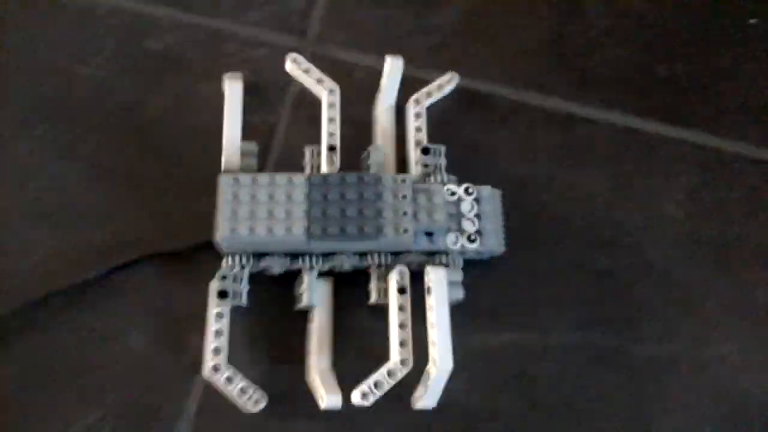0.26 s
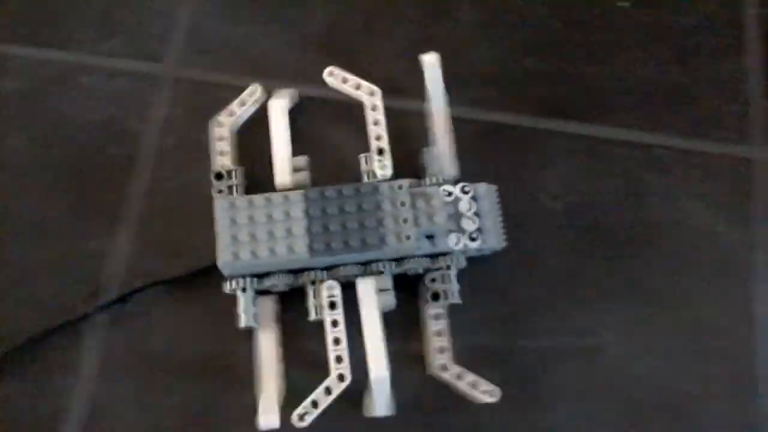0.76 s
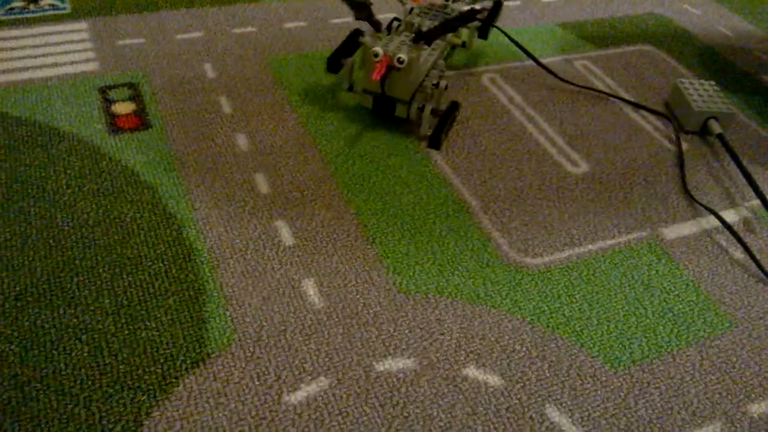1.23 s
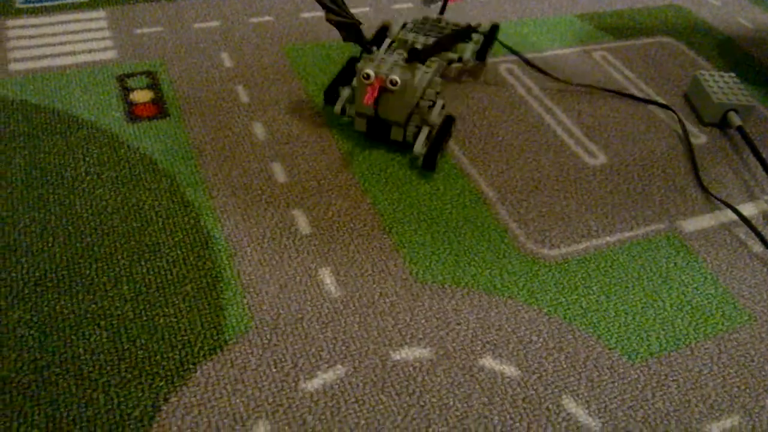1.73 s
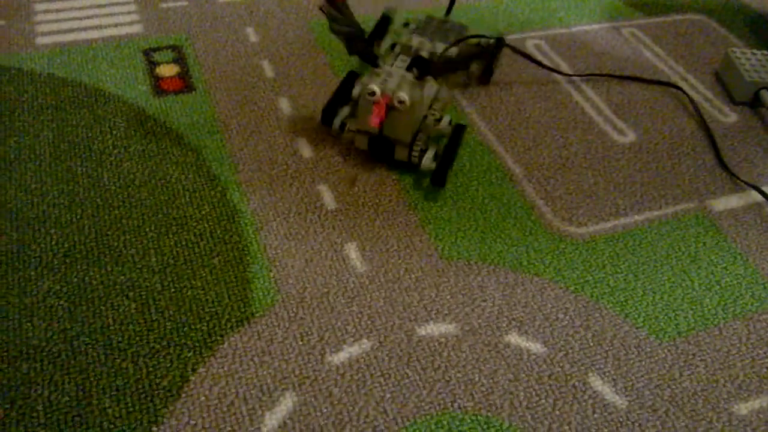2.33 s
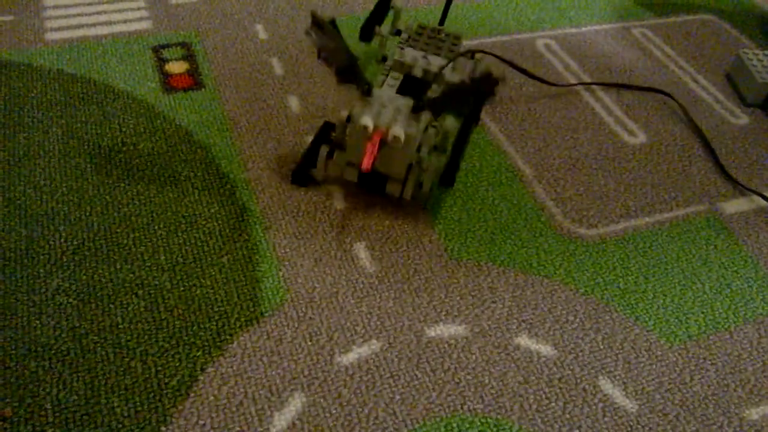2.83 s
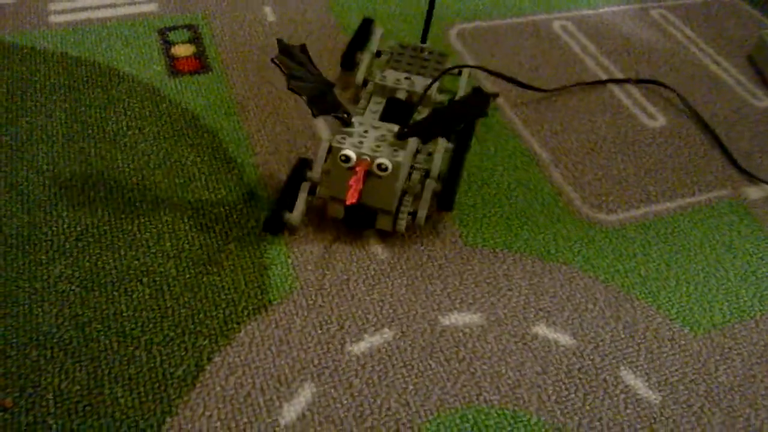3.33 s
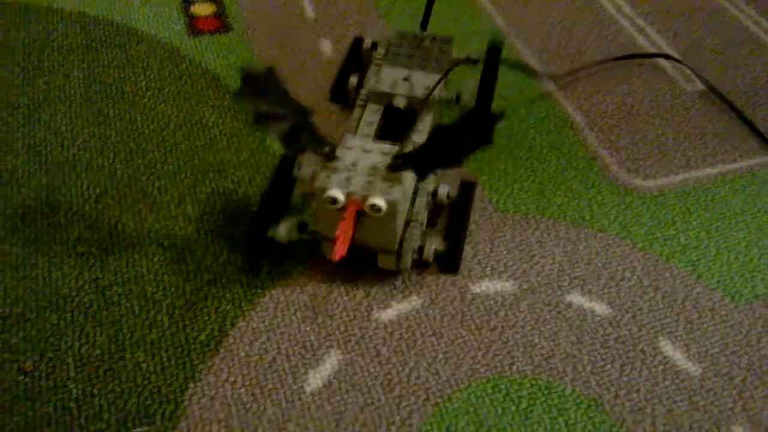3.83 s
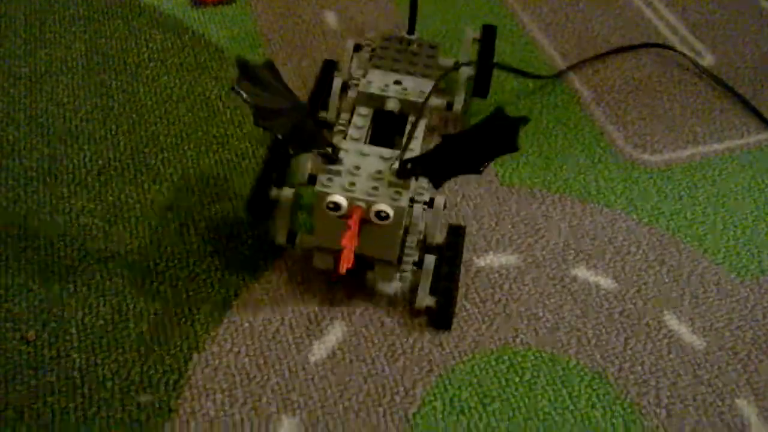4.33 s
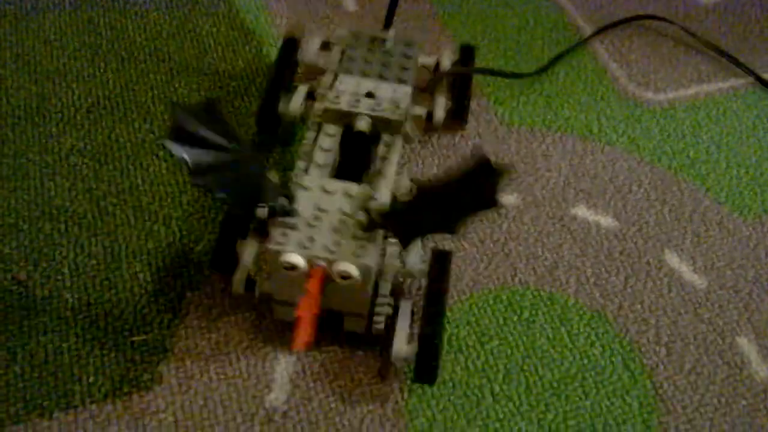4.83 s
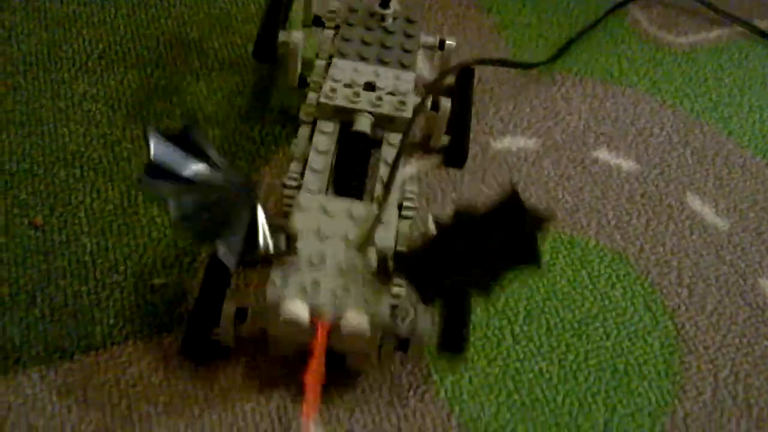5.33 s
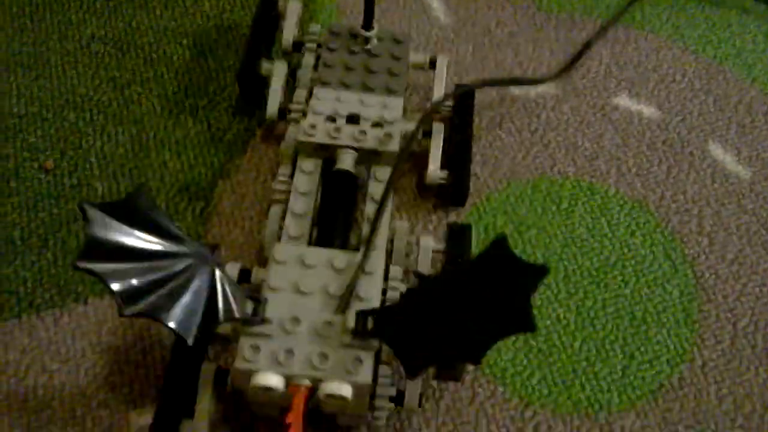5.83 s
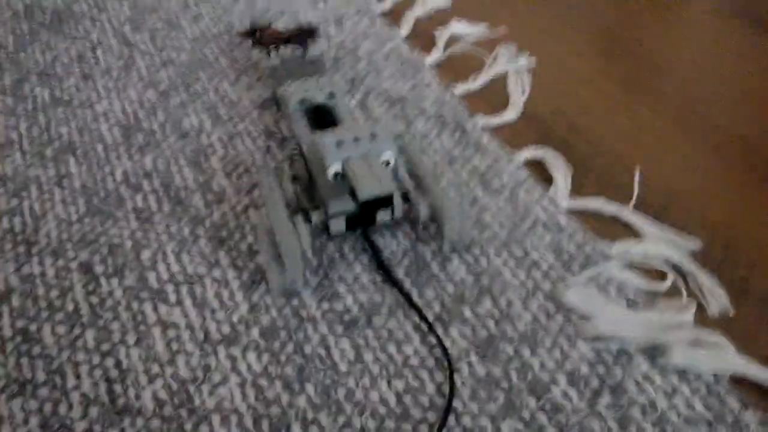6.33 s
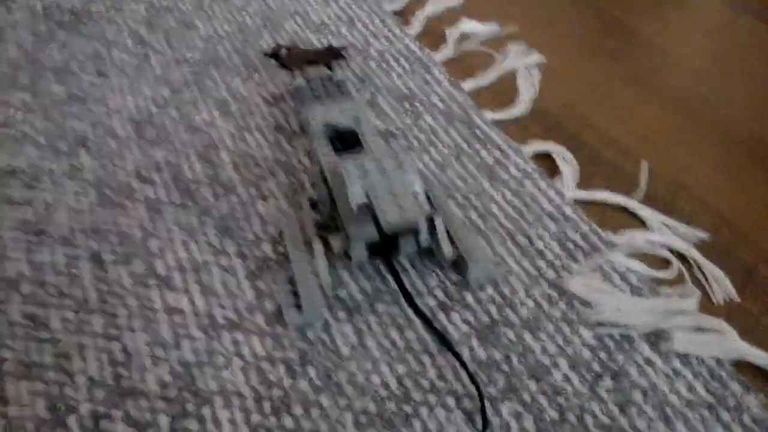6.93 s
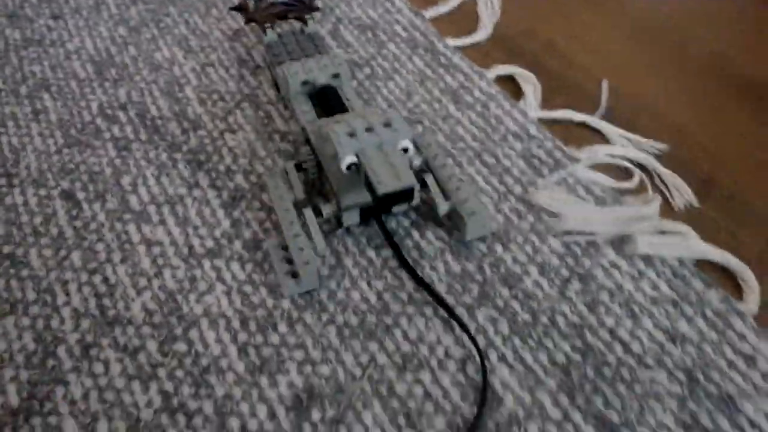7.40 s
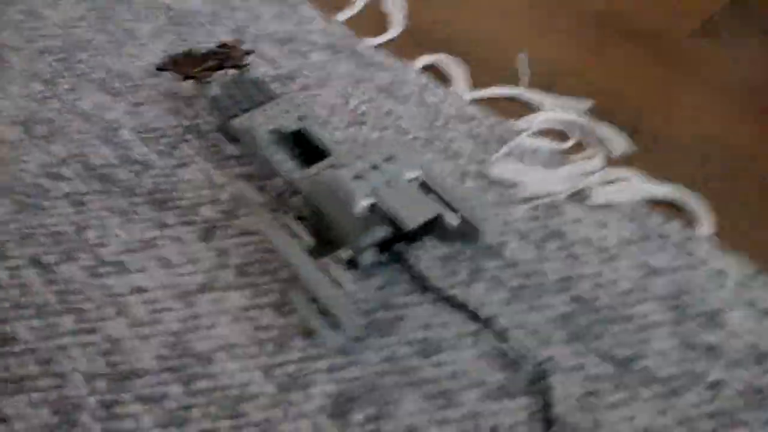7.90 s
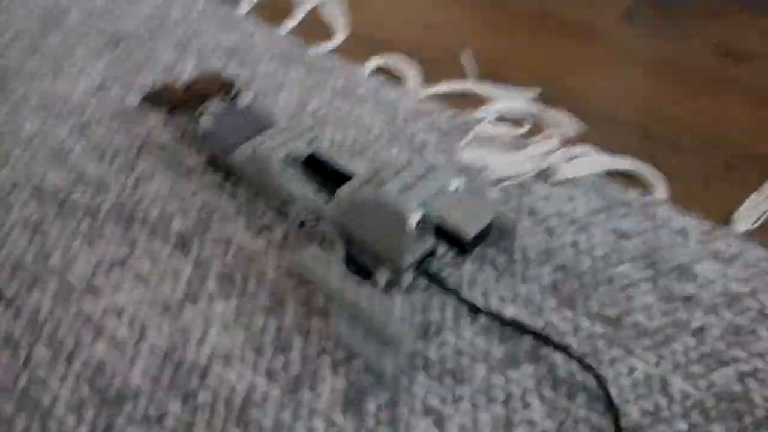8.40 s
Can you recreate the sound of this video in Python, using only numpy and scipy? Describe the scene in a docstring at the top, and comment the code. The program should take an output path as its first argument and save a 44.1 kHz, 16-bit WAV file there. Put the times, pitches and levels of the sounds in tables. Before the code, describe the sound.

Close dry rattle of small plastic gear toys: clattering steps over a faint hum, pulsing gear buzz growing nearer, then dull thuds with free-running whirrs.

```python
"""Three motorised plastic-brick walkers, close by indoors, one scene each.
A spider clacks over tiles on a humming motor, its legs squeaking, until a button is pressed.
A dragon crosses a play mat: gears surge twice a stride, its shaft snaps; two more presses follow.
A long-tailed creature thuds onto a rug, its slack gears run free, and it turns side-on at last.
Gear-tooth contacts, clacks and shaft ticks are noise bursts ringing resonances; thuds are damped sines."""
import sys
import numpy as np
from scipy import signal
from scipy.fft import rfft, irfft
from scipy.io import wavfile
from scipy.ndimage import uniform_filter1d

SR = 44100
rng = np.random.default_rng(int(sys.argv[2]) if len(sys.argv) > 2 else 0)


def wav_out(sig):
    """Save sig, one row per channel (or a flat mono array), as 16-bit PCM at SR to the path in sys.argv[1]."""
    wavfile.write(sys.argv[1], SR, np.round(np.clip(np.atleast_2d(sig).T, -1, 1) * 32767).astype(np.int16))


N = 381906
T = np.arange(N) / SR  # s
HZ = np.fft.rfftfreq(4096, 1 / SR)  # filter design grid
DRAGON_STRIDE_S = .6275

# The three scenes. Each row: start in seconds, end in seconds, fade-in in seconds.
SCENES = [(-.01, 1.021, 0.0068), (1.066, 6.224, 0.077), (6.286, 8.7, 0.1)]


def amp(db):
    """Decibels to gain."""
    return 10 ** (np.asarray(db) / 20)


def evened(x):
    """Scales to rms 1."""
    return x / np.sqrt(np.mean(x ** 2) + 1e-20)


def steadied(x, size=2600):
    """Scales to rms 1 locally, leaving the fast grain."""
    local_power = uniform_filter1d(uniform_filter1d(x ** 2, size), size)
    return x / np.sqrt(local_power + 1e-12)


def read(points, hz):
    """Reads a table on a log-frequency axis."""
    f, value = np.transpose(points)
    return np.interp(np.log(hz + 1), np.log(f), value)


def over_time(points):
    """Reads a table of (s, value) at every sample."""
    return np.interp(T, *np.transpose(points))


def add(mix, s, sound):
    """Mixes a sound in at time s."""
    part = mix[max(round(s * SR), 0):][:len(sound)]
    part += sound[:len(part)]


def drift(size):
    """Slow random signal of rms 1, smoothed twice over size samples."""
    return evened(uniform_filter1d(uniform_filter1d(rng.standard_normal(N), size), size))


def swell(t, rise_s, hold_s, fall_s):
    """Rises to 1 at t = 0, holds, and falls back to 0."""
    rise = 1 + t / rise_s
    fall = 1 - (t - hold_s) / fall_s
    return np.clip(np.minimum(rise, fall), 0, 1)


def jolt(s, decay_s):
    """Jumps to 1 at time s and dies away."""
    return (T >= s) * np.exp(-abs(T - s) / decay_s)


def resonances(modes):
    """Gain over frequency of damped modes; each is 3 dB down at the edges of its width."""
    power = 0
    for hz, width_hz, db in modes:
        power = power + (amp(db) / (1 + (1.3 * (HZ - hz) / width_hz) ** 2)) ** 2
    return np.sqrt(power)


def colour(x, gain):
    """Causal minimum-phase filter of unit energy, shaped by the gain over frequency."""
    log_gain = np.log(np.maximum(np.r_[gain, gain[-2:0:-1]], 1e-5))
    taps = np.fft.ifft(np.exp(np.conj(signal.hilbert(log_gain)))).real
    return signal.oaconvolve(x, taps / np.linalg.norm(taps))[:len(x)]


def contact(decay_s, size=900):
    """Plastic meets plastic: a burst of tiny rebounds, of unit energy."""
    t = np.arange(size) / SR
    envelope = np.exp(-t / decay_s) * (1 - np.exp(-t / 0.00051))
    burst = rng.standard_normal(size) * envelope
    return burst / np.linalg.norm(burst)


def strikes(rate_hz, jitter, spread_db, decay_s, count=10):
    """Contacts at a running rate, uneven in time and force, on several different teeth."""
    turns = np.cumsum(rate_hz) / SR + rng.random()
    at = np.flatnonzero(np.diff(np.floor(turns)))
    late, force = np.clip(rng.standard_normal((N // 20, 2))[:len(at)], -2, 2).T
    at = np.clip(at + jitter * late * SR / rate_hz[at], 0, N - 1).astype(int)  # jitter in periods
    tooth = rng.integers(0, count, N // 20)[:len(at)]
    out = np.zeros(N)
    for k in range(count):
        train = np.bincount(at, amp(spread_db * force) * (tooth == k), N)
        out += signal.oaconvolve(train, contact(decay_s))[:N]
    return evened(out)


def in_room(x, wet_db, size=14000):
    """Adds a short diffuse tail that dies fastest around 6 kHz."""
    # Reverberation. Each row: frequency in Hz, time to fall 60 dB in seconds.
    room_t60 = [(200, 0.47), (2000, 0.33), (6000, 0.13), (14000, 0.37)]
    noise = rng.standard_normal(size) * (np.arange(size) > 200)
    hz, t, z = signal.stft(noise, SR, nperseg=256)
    decay_db = -60 * t / read(room_t60, hz)[:, None]
    tail = signal.istft(z * amp(decay_db), SR, nperseg=256)[1]
    return x + amp(wet_db) * signal.oaconvolve(x, tail / np.linalg.norm(tail))[:N]


def shifting(x, patchy_db, size=512):
    """Moving parts shade and bare one another, so the rattle's colour keeps shifting."""
    z = signal.stft(x, nperseg=size)[2]
    patches = uniform_filter1d(rng.standard_normal(z.shape), size=9, axis=0)  # over frequency
    patches = uniform_filter1d(patches, size=12, axis=1)  # over time
    return signal.istft(z * amp(patchy_db * evened(patches)), nperseg=size)[1][:N]


def turning(x, tone, share):
    """Blends in the tone that a walker has when heard from another side."""
    other = irfft(rfft(x) * amp(read(tone, np.fft.rfftfreq(N, 1 / SR))), N)
    return x + share * (other - x)


def rumble(level_db, floor, uneven_db):
    """Small dense bumps make a low rumble."""
    bumps = strikes(np.full(N, 260), jitter=.5, spread_db=3.5, decay_s=.003, count=4)
    gain = amp(read(floor, HZ) - HZ / 400)  # treble loss on top of the floor's own response
    return amp(level_db + uneven_db * drift(size=2200)) * steadied(colour(bumps, gain))


def whine(x):
    """Faint high tones that follow the level of the treble."""
    # Thin tones. Each row: frequency in Hz, level in dB against the mean size of the treble.
    whine_tones = [(7500, -19), (8000, -23), (8500, -25), (9000, -23), (10499, -12), (11000, -25)]
    treble = signal.sosfilt(signal.butter(4, 7000, "high", fs=SR, output="sos"), x)
    level = uniform_filter1d(abs(treble), size=3000) * (x != 0)
    tones = sum(amp(db) * np.sqrt(2) * np.sin(2 * np.pi * hz * T) for hz, db in whine_tones)
    return level * tones


def knocks(rows, damping):
    """Dull blows: a low push that is gone within two cycles."""
    out = np.zeros(N)
    for s, peak_db, hz, *_ in rows:
        cycles = hz * T[:1000]
        push = np.sin(2 * np.pi * cycles) * cycles * np.exp(-damping * cycles)
        add(out, s, amp(peak_db) * push / abs(push).max())
    return out


def button():
    """A pressed button knocks and nudges its case; the first press leaves it ringing faintly."""
    # Button presses. Each row: time in seconds, peak of the knock in dB, frequency in Hz.
    presses = [(0.9663, -19.5, 650), (6.0394, -40.5, 650), (6.1753, -25, 590)]
    thump_hz, thump_db = 202, -14  # nudge of the whole case, against the knock
    out, t = knocks(presses, damping=3), T[:6000]
    add(out, presses[0][0], amp(-43) * np.sin(2 * np.pi * 402 * t) * np.exp(-t / 0.068))
    thumps = [(s, db + thump_db, thump_hz) for s, db, _ in presses]
    return out + knocks(thumps, damping=2.4)


def squeaks():
    """Rubbing legs: quick uneven slips excite one narrow mode of a leg."""
    # Squeaks. Each row: start in seconds, end in seconds, frequency in Hz, level in dB.
    rubs = [(0.323, 0.367, 2150, -37), (0.538, 0.743, 2105, -47), (7.591, 7.782, 2224, -39.5),
            (8.547, 8.668, 2360, -42.5)]
    out = np.zeros(N)
    slips = strikes(np.full(N, 400), jitter=0.28, spread_db=-1.5, decay_s=0.0029, count=3)
    for start, end, hz, db in rubs:
        rub = np.clip(np.minimum(T - start, end - T) / 0.032, 0, 1)
        out += amp(db) * rub * colour(slips, resonances([(hz, 135, 0)]))
    return out


def clacks(rows, span, body, decay_s):
    """Hard contacts of the gait, and other clacks, ring the same body."""
    # Other clacks, including those around the button press.
    # Each row: time in seconds, level in dB, brightness in dB per octave.
    other_clacks = [(.0585, -53, -2.5), (0.092, -54, -12), (0.3937, -52, -2), (.4793, -42, -1),
                    (0.7963, -47, -10), (0.9649, -41, -7.5), (1.0134, -49, -14), (4.8127, -48.5, 1),
                    (5.5714, -41.5, 10), (5.8657, -42.5, 3), (6.1963, -43, 8), (6.3882, -42.5, 2),
                    (6.4399, -48, 0.5), (6.891, -45, 2), (7.073, -46, -1.5), (7.2343, -44, -1),
                    (7.6108, -39.5, -2), (7.7012, -33.5, -4), (7.7689, -37.5, 19), (8.323, -33, 6),
                    (8.5857, -38, 8)]
    octaves = np.log2(np.clip(HZ, 1500, 10000) / 4000)
    out = np.zeros(N)
    for s, db, tilt_db in rows + other_clacks:
        if span[0] <= s < span[1]:
            gain = resonances(body) * amp(tilt_db * octaves)
            add(out, s, amp(db) * evened(colour(contact(decay_s), gain)))
    return out


def gear_tone(pitch_hz, level_db, waver):
    """The fastest gear sings a thin, unsteady note."""
    turns = np.cumsum(pitch_hz * (1 + waver * drift(size=500))) / SR
    return amp(level_db) * (1 + 0.58 * drift(size=700)) * np.sin(2 * np.pi * turns)


def gears(level_db, treble_db, body, wheel, turn_hz, surge, mesh_hz, slap_db, strain, tick_db, spread_db):
    """Dense tooth contacts ring the body; once a turn a slack wheel slaps and the shaft ticks."""
    # Ring of the shaft. Each row: frequency in Hz, width in Hz, level in dB.
    shaft_ring = [(12050, 400, 0)]
    freedom_db = level_db - uniform_filter1d(level_db, size=26000)  # loud when it runs free
    speed = amp(surge * freedom_db)
    mesh = strikes(mesh_hz * speed, jitter=.35, spread_db=spread_db, decay_s=.0018)
    slaps = strikes(turn_hz * speed, jitter=.08, spread_db=1.5, decay_s=.0015)
    slaps *= amp(slap_db - strain * freedom_db)  # the load on the legs changes how hard the wheel slaps
    rattle = colour(mesh, resonances(body)) + colour(slaps, resonances(wheel))
    rattle = shifting(rattle, patchy_db=2)
    ticks = strikes(turn_hz * speed, jitter=.02, spread_db=2.5, decay_s=.0006)
    ticks = colour(ticks, resonances(shaft_ring))
    low = signal.sosfiltfilt(signal.butter(4, 7000, fs=SR, output="sos"), rattle)
    high = evened(rattle - low) + amp(tick_db) * ticks
    return amp(level_db) * (steadied(low) + amp(treble_db) * steadied(high))


def spider():
    """Hard feet on a live tiled floor; each step jolts the gears, over a low motor hum."""
    # Resonances of the hollow body, and the sharp ring of the gear frame.
    # Each row: frequency in Hz, width in Hz, level in dB.
    body = [(1240, 350, -1.5), (1840, 370, 4), (2180, 510, -1), (3330, 360, -2.5), (5260, 1670, -3),
            (6390, 400, -1), (7650, 310, 1.5), (8760, 670, 2), (10560, 1050, -0.5), (13000, 1200, -4.5)]
    frame = [(1980, 150, -9)]
    # Steps, heavy and light in turn. Each row: time in seconds, level in dB, brightness in dB per
    # octave, lead-in taps in dB against the step, jolt to the gears in dB.
    steps = [(-.025, -36, -2, -25, 12.5), (.168, -31.5, 1.5, -12.5, 13), (0.3348, -37.5, -1.5, -27, 6.5),
             (.5265, -33.5, .5, -9, 12), (.686, -37.5, -0.5, -29, 6.5), (0.8736, -34.5, -1, -10, 11)]
    # Other feet touch this long before a step, in seconds.
    lead_in_s = [.048, 0.023, .007]
    # Tiles shaking. Each row: frequency in Hz, relative level in dB.
    tiles = [(15, -10), (38, 0), (90, 4), (140, -7.5), (230, -5), (370, -9), (520, -20.5), (900, -25)]
    # Rumble on the tiles. Each row: time in seconds, level in dB.
    tile_rumble = [(0, -52.5), (.13, -53.5), (.25, -50.5), (.32, -45.5), (.45, -58), (.62, -53),
                   (.79, -49.5), (.93, -53.5)]
    base_db, jolt_s = -50.5, .09
    bounce_s, bounce_db = .0085, -4  # the foot lands a second time

    level_db = base_db + sum(jolt_db * jolt(s, jolt_s) for s, *_, jolt_db in steps)
    treble_db = -4.5 - 0.19 * (level_db - base_db)
    drive = gears(level_db, treble_db, body + frame, body, turn_hz=32.87, surge=.055, mesh_hz=300,
                  slap_db=-5, strain=0.46, tick_db=-11, spread_db=-0.5)
    contacts = []
    for s, db, tilt_db, taps_db, _ in steps:
        contacts += [(s, db, tilt_db), (s + bounce_s, db + bounce_db, tilt_db)]
        contacts += [(s - lead, db + taps_db, tilt_db) for lead in lead_in_s]
    feet = clacks(contacts, SCENES[0], body, decay_s=0.0039)
    hum_level = amp(-57) * (1 + 0.69 * drift(size=2000))
    hum_hz = 168 + 4 * drift(size=3000)
    hum = hum_level * np.sin(2 * np.pi * np.cumsum(hum_hz) / SR)
    floor = rumble(over_time(tile_rumble), tiles, uneven_db=1)
    return in_room(drive, wet_db=-9) + in_room(feet, wet_db=-7.0) + hum + floor


def dragon_surge(t, count=9):
    """Rise of the rattle in dB as each leg pair swings free, stride after stride."""
    # The two leg pairs. Each row: first swing in seconds, rise, hold and fall in seconds, surge in dB.
    swings = [(1.157, .15, .03, .13, 10.5), (1.42, .085, .05, .14, 10)]
    surge_db = 0
    for first, rise_s, hold_s, fall_s, db in swings:
        for k in range(count):
            surge_db = surge_db + db * swell(t - first - k * DRAGON_STRIDE_S, rise_s, hold_s, fall_s)
    return surge_db


def dragon(count=8):
    """Soft mat, no footsteps: the gears surge twice a stride and the shaft sometimes snaps."""
    # Resonances of the body, ring of the gear frame, ring of the slapping wheel.
    # Each row: frequency in Hz, width in Hz, level in dB.
    body = [(456, 230, -15), (1330, 483, -6.5), (1850, 110, -26.5), (2384, 595, -1.5), (4294, 960, -0.5),
            (5600, 390, -7.5), (6450, 180, -8.5), (7970, 330, 6), (9060, 370, 8), (10830, 2030, 13),
            (12960, 1600, 7.5)]
    frame = [(1730, 90, 1), (1840, 60, -2)]
    wheel = [(2410, 630, -4.5), (4050, 720, 1.5), (6410, 164, 3.5), (9200, 2500, -5)]
    # Walk towards the listener. Each row: time in seconds, rattle under load in dB, treble share
    # in dB, rumble in dB; the swings add to all three.
    approach = [(1.149, -60.5, -3.5, -70.5), (1.5, -56.5, -4.5, -67), (2.8, -55.5, -3.5, -64.5),
                (4.202, -52.5, -4, -66.5), (5.098, -52, -2.5, -61), (6.201, -50.5, -4, -61)]
    # Tone from afar against close up. Each row: frequency in Hz, gain in dB.
    far_tone = [(500, -1), (1300, -1.5), (2500, .5), (4400, -0.5), (6300, 1.5), (9000, 1.5), (11500, -1.5),
                (14000, 0)]
    # The shaft catches and snaps free. Each row: time in seconds, nominal peak in dB (rms + 9 dB).
    shaft_snaps = [(2.9762, -32), (3.059, -30.5), (3.6, -32), (4.2266, -31.5), (5.8661, -31.5)]
    # Slack taken up with a click, twice a stride. Each row: first click in seconds, level in dB
    # against the rattle under load, brightness in dB per octave.
    backlash = [(1.3215, 4.5, 0), (1.6075, .5, -3)]
    # Mat shaking. Each row: frequency in Hz, relative level in dB.
    mat = [(15, -19), (45, -7), (72, 1.5), (100, -9), (150, -13.5), (280, -20.5), (450, -19.5), (700, -35),
           (900, -40)]
    scrape_lead_s, scrape_share = 0.013, 0.65  # the treble swells ahead of each swing
    settle_lag_s, settle_share = 0.014, 0.45  # the weight comes down just after it

    times, *columns = np.transpose(approach)
    near_db, treble_db, rumble_db = (np.interp(T, times, column) for column in columns)
    surge_db = dragon_surge(T)
    level_db = near_db + surge_db
    treble_db = treble_db + scrape_share * (dragon_surge(T + scrape_lead_s) - surge_db)
    drive = gears(level_db, treble_db, body + frame, wheel, turn_hz=42.16, surge=.3, mesh_hz=701.7,
                  slap_db=-22.5, strain=0.27, tick_db=-10, spread_db=3.5)
    drive = drive + gear_tone(1670 * amp(0.058 * surge_db), level_db - 19, waver=0.01244)
    drive = turning(drive, far_tone, np.interp(T, [3.4, 5.4], [1, 0]))
    snaps = np.zeros(N)
    snap_gain = resonances([(11400, 1300, 0), (9600, 600, -8)])
    for s, db in shaft_snaps:
        add(snaps, s, amp(db - 9) * evened(colour(contact(.0018), snap_gain)))
    clicks = []
    for first, db, tilt_db in backlash:
        for s in first + DRAGON_STRIDE_S * np.arange(count):
            clicks.append((s, np.interp(s, T, near_db) + db, tilt_db))
    joints = clacks(clicks, SCENES[1], wheel, decay_s=.0028)
    floor = rumble(rumble_db + settle_share * dragon_surge(T - settle_lag_s), mat, uneven_db=1)
    return in_room(drive + joints + snaps, wet_db=-11.5) + floor


def creature():
    """Each stride the body thuds down, slack gears run free, and the legs catch; at last it turns side-on."""
    # Resonances of the body, ring of the gear frame, ring of the slapping wheel.
    # Each row: frequency in Hz, width in Hz, level in dB.
    body = [(470, 45, -10), (1254, 333, 0.5), (1650, 260, 3), (2014, 370, -0.5), (2730, 640, -10),
            (3440, 340, -7.5), (4930, 590, 2.5), (6030, 1200, -8.5), (9090, 2000, -2), (10570, 170, 0),
            (11830, 900, -7.5), (13500, 840, -4)]
    frame = [(1400, 70, -1), (1610, 90, 2)]
    wheel = [(1560, 490, -8), (4850, 650, 2.5), (6340, 1000, -9.5), (9100, 810, -1.5)]
    # Drops onto the rug. Each row: time in seconds, peak in dB, frequency in Hz, rattle of the free
    # run that follows in dB.
    footfalls = [(6.207, -10, 346, -44), (6.7245, -23, 346, -41.5), (7.2392, -24, 352, -40.5),
                 (7.758, -19.5, 341, -39.5), (8.2782, -22.5, 327, -41)]
    # The tail bumps the rug. Each row: time in seconds, peak in dB, frequency in Hz.
    tail_bumps = [(6.44, -46, 300), (6.836, -42, 365)]
    # Tone once side-on, against before. Each row: frequency in Hz, gain in dB.
    side_tone = [(1000, 3), (1700, -0.5), (2900, 6), (3700, 1.5), (4900, -5), (7500, 2), (9300, -12),
                 (12000, 2), (14000, -8)]
    # Rug shaking. Each row: frequency in Hz, relative level in dB.
    rug = [(15, -23), (40, -2), (75, 3), (130, -6), (220, -11), (400, -15), (650, -17.5), (900, -44)]
    # Low rumble, stronger from about 7.6 s. Each row: time in seconds, level in dB.
    low_rumble = [(6.4, -59), (7.1, -60.5), (7.5, -58), (7.65, -51), (7.95, -53), (8.15, -53),
                  (8.65, -55.5)]
    lift_db = -50  # rattle while the legs lift the body
    run_up_s, free_run_s, stall_s = .11, .312, .025  # speeds up before the drop, free until the catch
    bind_db, bind_s = 3, .03  # the gears grind harder just before the legs catch
    catch_s, catch_db, catch_tilt_db = .307, 1.5, -2.5  # catching clack, against the free rattle
    landing_s, landing_db, landing_tilt_db = 0.0087, -0.5, 1  # frame clack just after the thud
    shake_db, shake_rumble_db, shake_s = 5.5, 12, .05  # each drop shakes the gears and the floor

    turned = np.interp(T, [8.05, 8.25], [0, 1])
    level_db, treble_db, shake, contacts = lift_db, -5.5 + 6.5 * turned, 0, []
    for s, _, _, run_db in footfalls:
        free = swell(T - s, run_up_s, free_run_s, stall_s)
        bind = swell(T - s - catch_s, bind_s, 0, stall_s)
        level_db = level_db + (run_db - lift_db) * free + bind_db * bind
        treble_db = treble_db - 2.5 * free
        shake = shake + jolt(s, shake_s)
        contacts += [(s + landing_s, run_db + landing_db, landing_tilt_db),
                     (s + catch_s, run_db + catch_db, catch_tilt_db)]
    drive = gears(level_db + shake_db * shake, treble_db, body + frame, wheel, turn_hz=55.7, surge=.17,
                  mesh_hz=559, slap_db=-6.0, strain=-0.18, tick_db=-20, spread_db=2.5)
    pitch_hz = np.interp(T, [7.5, 7.8], [1550, 1505]) * amp(.045 * (level_db - lift_db))
    drive = drive + gear_tone(pitch_hz, level_db - 11, waver=.022)
    drive = drive + clacks(contacts, SCENES[2], body + wheel, decay_s=.0025)
    thuds = in_room(knocks(footfalls + tail_bumps, damping=2.7), wet_db=-15)
    floor = rumble(over_time(low_rumble) + shake_rumble_db * shake, rug, uneven_db=2.1)
    return in_room(turning(drive, side_tone, turned), wet_db=-9.0) + thuds + floor


def scene():
    """The three scenes, each fading in and cut off sharply; only the treble has any width."""
    # Stereo width. Each row: frequency in Hz, side against mid in dB.
    side_width = [(3000, -89), (5500, -77), (7200, -24.5), (8500, 0), (10000, -11), (11200, -0.5),
                  (14000, -49)]
    mid, extras = np.zeros(N), button() + squeaks()
    for (start, end, fade), walker in zip(SCENES, (spider(), dragon(), creature())):
        opening = np.clip((T - start) / fade, 0, 1) ** 3 * np.clip((end - T) / 0.0034, 0, 1)
        mid += opening * (walker + extras)
    scatter = np.exp(1j * np.cumsum(rng.standard_normal(len(HZ)) * .6))  # random phase
    side_taps = np.roll(irfft(scatter * amp(read(side_width, HZ))), len(HZ) - 2)
    side = signal.oaconvolve(mid, side_taps, "same")
    return np.array([mid + side, mid - side]) + whine(mid)


def record(dry):
    """Band limit: a steep linear-phase low-pass."""
    edge_hz = 14400
    taps = signal.firwin(301, edge_hz, window=("kaiser", 8), fs=SR)
    return signal.oaconvolve(dry, taps[None], "same")


dry = scene()
out = record(dry)
wav_out(out)
```